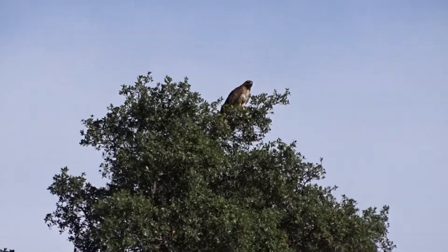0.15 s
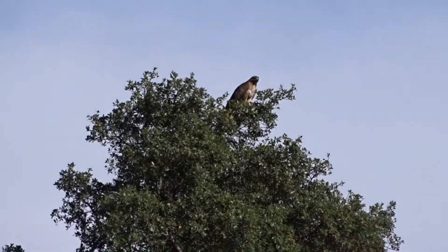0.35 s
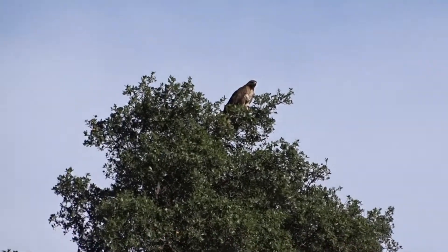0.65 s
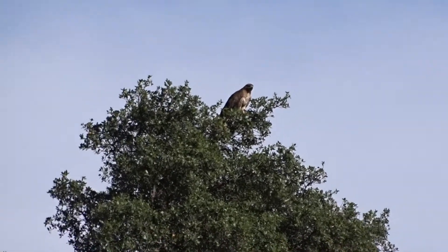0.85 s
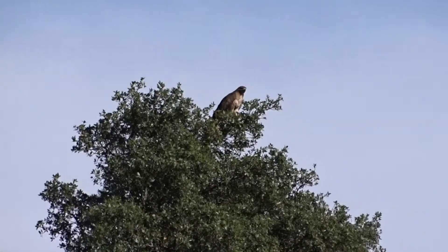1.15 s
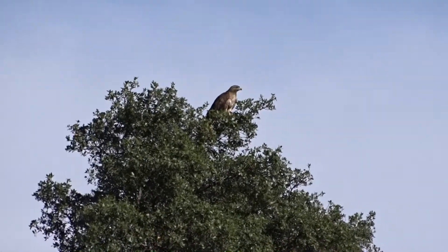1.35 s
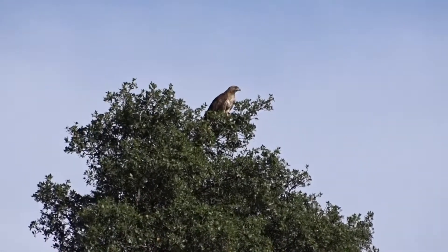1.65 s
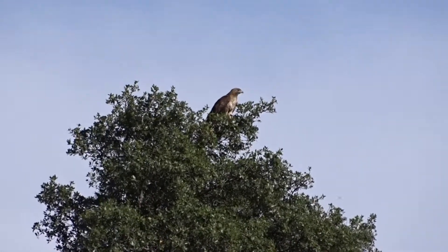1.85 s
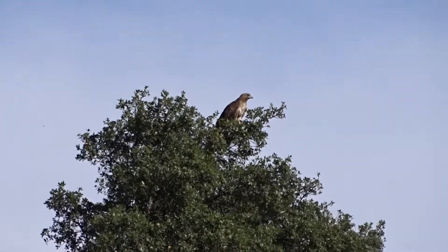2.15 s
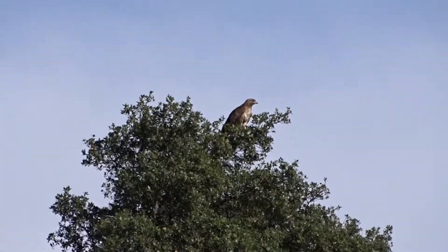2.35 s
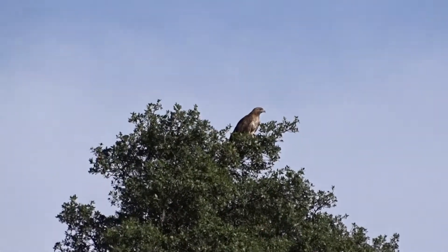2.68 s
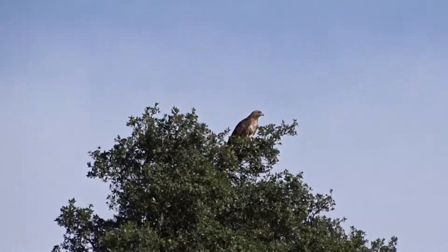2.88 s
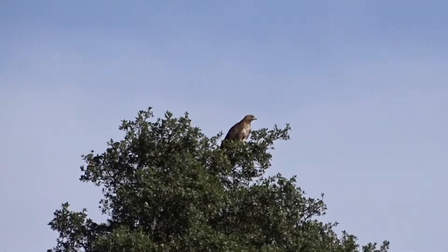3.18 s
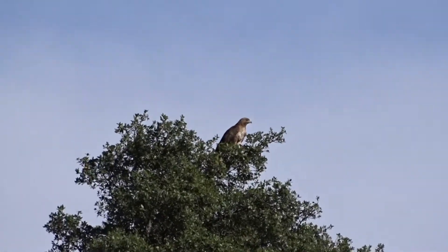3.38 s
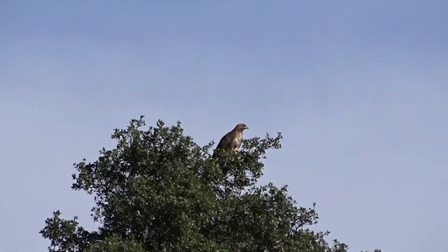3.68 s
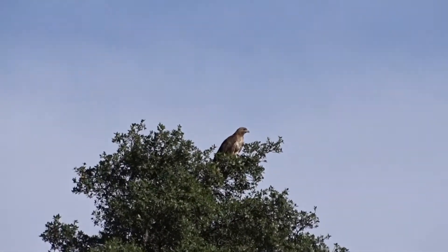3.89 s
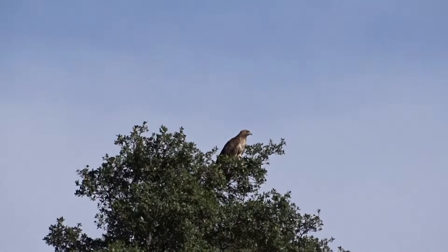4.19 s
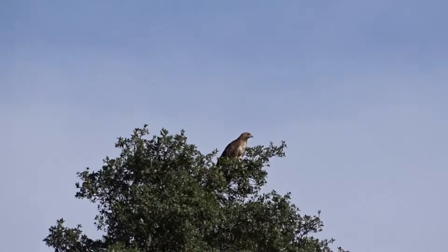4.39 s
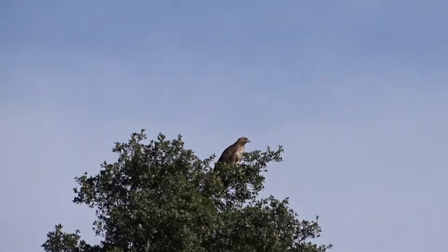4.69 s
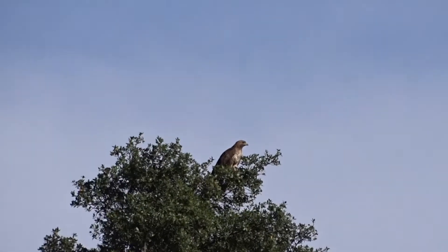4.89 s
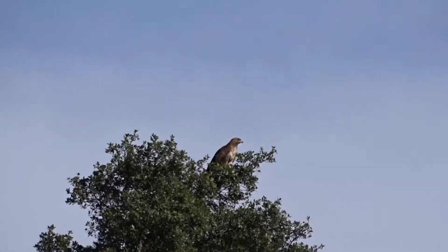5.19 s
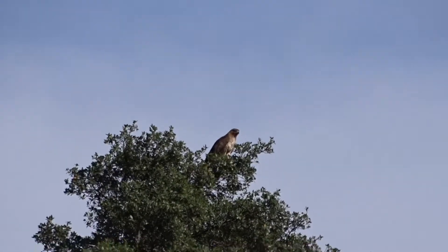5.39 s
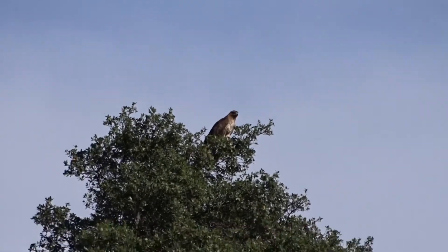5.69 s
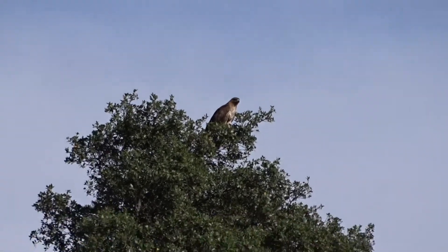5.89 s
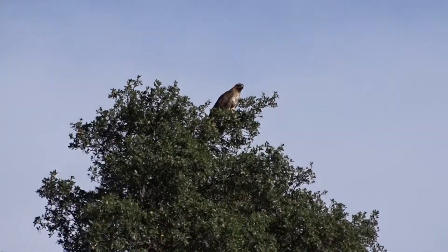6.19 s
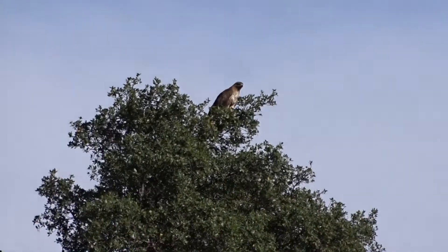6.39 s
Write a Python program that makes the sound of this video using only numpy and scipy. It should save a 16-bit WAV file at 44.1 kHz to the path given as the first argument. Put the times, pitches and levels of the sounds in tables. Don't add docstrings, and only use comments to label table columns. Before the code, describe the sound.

A perched hawk gives one harsh, raspy scream sliding downward for two seconds, over low wind thumps, distant traffic and faint bird chirps.

```python
import sys
import numpy as np
from scipy import signal
from scipy.fft import rfft, irfft
from scipy.io import wavfile
from scipy.ndimage import uniform_filter1d, minimum_filter1d

SR = 44100
rng = np.random.default_rng(int(sys.argv[2]) if len(sys.argv) > 2 else 0)


def volts(x):
    e = np.asarray(x, float) / 20
    return 10 ** e


def dump_mix(stems):
    frames = np.atleast_2d(stems).T
    limited = np.clip(frames, -1, 1)
    pcm = np.round(limited * 32767).astype(np.int16)
    wavfile.write(sys.argv[1], SR, pcm)


N = 288546
T = np.arange(N) / SR


def unit(x):
    return x / np.sqrt(np.mean(x ** 2))


def colour(x, table):
    hz, db = np.transpose(table)
    f = np.maximum(np.arange(N // 2 + 1) * SR / N, 1)
    curve_db = np.interp(np.log(f), np.log(hz), db, left=-90, right=-90)
    return irfft(rfft(x) * volts(curve_db), N)


def walk(rate_hz):
    k = max(int(SR / rate_hz), 1)
    noise = rng.standard_normal(N)
    return unit(uniform_filter1d(uniform_filter1d(noise, k), k))


def read(rows, fade_s=0.0036):
    s, *columns = np.transpose(rows)
    gate = np.clip(np.minimum(T - s[0], s[-1] - T) / fade_s + .5, 0, 1)
    return [np.interp(T, s, c) for c in columns] + [gate]


def ring(hz, width_hz):
    carrier = np.exp(2j * np.pi * np.cumsum(hz) / SR)
    return np.real(carrier * (walk(width_hz) + 1j * walk(width_hz)))


def pan(x, left_minus_right_db):
    half_db = left_minus_right_db / 2 + 0 * T
    return x * volts(np.array([half_db, -half_db]))


def stretch(s, length_s, from_hz, to_hz, fade_s=0.007):
    at = slice(int((s - fade_s) * SR), int((s + length_s + fade_s) * SR))
    gone = (T[at] - s) / length_s
    gate = np.clip(np.minimum(gone, 1 - gone) * length_s / fade_s + .5, 0, 1)
    gone = np.clip(gone, 0, 1)
    return at, gone, from_hz + (to_hz - from_hz) * gone, gate


def leaves(x, t60_s, db):
    t = T[:int(t60_s * SR)]
    tail = rng.standard_normal((2, len(t))) * np.exp(-np.log(1000) * t / t60_s)
    tail = tail / np.sqrt(np.sum(tail ** 2, axis=1, keepdims=True))
    return x + volts(db) * signal.fftconvolve(x[None], tail, axes=1)[:, :N]


def bed(table, side_db):
    mid, side = (colour(rng.standard_normal(N), table) * volts(0.31 * walk(6.8)) for _ in range(2))
    return unit(mid + volts(side_db) * side * np.array([[1], [-1]]))


# t/s, buffet level/dB, deep bass re buffet/dB
WIND_CURVE = [(0.0, -38, 0.5), (.55, -35, -6.5), (.9, -32, -12), (1.07, -34.5, -7.5), (1.18, -53.5, 0.5),
              (1.42, -34, 0), (1.58, -44, -4.5), (1.69, -26.5, -8), (1.8, -42.5, -2), (2.04, -40, 2),
              (2.55, -35.5, 1), (2.8, -46, 0), (3.35, -54, 3.5), (4.43, -42.5, -1.5), (4.87, -51.5, 7),
              (5.32, -43, 1), (5.75, -48.5, 4), (6.3, -47, 5)]
# f/Hz, level/dB per Hz
GUST_SPECTRUM = [(8.8, -46.5), (15, -9.5), (38, 2), (113, -0.5), (207, -8.5), (383, -20.5), (600, -38.5),
                 (780, -58), (1320, -120)]


def wind():
    db, deep_db, _ = read(WIND_CURVE)
    out, puffs = 0, np.clip(walk(34), -2.5, 2.1)
    bands = [(15, 60, .85, 1.5), (60, 95, .55, 2.5), (95, 130, .4, 3), (130, 220, .05, 4), (220, 600, -.7, 5)]
    for lo, hi, alike, lump_db in bands:
        band = [(lo * 0.89, -40), (lo, 0), (hi, 0), (hi * 0.99, -40)]

        def gusts():
            noise = colour(colour(rng.standard_normal(N), GUST_SPECTRUM), band)
            return noise * volts(lump_db * puffs + 1.2 * walk(5))

        mid, side = gusts(), gusts()
        deep = volts(deep_db * np.clip((150 - hi) / 90, 0, 1))
        opposed = side * np.array([[1], [-1]])
        out = out + deep * (np.sqrt(1 + alike) * mid + np.sqrt(1 - alike) * opposed)
    return unit(out) * volts(db + 0.5)


# f/Hz, level/dB per Hz
TRAFFIC_SPECTRUM = [(150, -31.5), (250, -13.5), (492, -12.5), (552, -12.5), (590, -16), (668, -11.5),
                    (726, -16), (1160, -20), (1800, -42), (2340, -68.5), (3960, -120)]
# f/Hz, level/dB per Hz
AIR_SPECTRUM = [(760, -29.5), (1300, -5.5), (2050, -7), (2570, -7.5), (2760, -11.5), (2970, -11),
                (3310, -15), (4160, -14.5), (4770, -22), (5170, -16.5), (5720, -23), (6150, -20.5),
                (7370, -19.5), (10600, -14), (11400, -25), (14800, -53.5), (22000, -120)]
# t/s, half length/s, level/dB
CARS = [
    (0.1, 0.35, 2.5),
    (1.732, 0.49, 1.5),
    (6.1, 0.34, 4.5),
]
TRAFFIC_DB, AIR_DB = -55, -67.5
HUM_HZ, HUM_DB = 660, -66


def town():
    db = TRAFFIC_DB + sum(swell_db * np.exp(-((T - s) / half_s) ** 2) for s, half_s, swell_db in CARS)
    hum = volts(HUM_DB + 2.5 + 1.8 * walk(12)) * ring(HUM_HZ + 0 * T, 45)
    hum = hum * np.clip((3.1 - T) / .1, .4, 1)
    rustle = volts(db - 32.0 + 2.2 * walk(6)) * ring(3300 + 500 * walk(1.5), 1600)
    whine = volts(-81.5) * ring(2580 + 0 * T, 250)
    traffic = volts(db) * bed(TRAFFIC_SPECTRUM, side_db=-5.5)
    air = volts(AIR_DB) * bed(AIR_SPECTRUM, side_db=-1.5)
    return traffic + air + hum + whine + rustle


def bumps(rows, cycles):
    out = np.zeros((2, N))
    for s, db, hz, *side_db in rows:
        t = np.maximum(T - s, 0) * hz
        swing = np.e * t / cycles * np.exp(-t / cycles) * np.sin(2 * np.pi * t)
        out += pan(volts(db) * swing, sum(side_db))
    return out


# t/s, peak level/dB, f/Hz, left minus right/dB
THUMP_EVENTS = [(0.028, -25, 115, -2), (0.129, -26, 208, -5), (0.179, -35, 96, -9), (0.334, -55, 91, 0),
                (0.445, -25.5, 193, 0), (0.579, -46, 72.7, -0.5), (0.654, -31, 114, 14),
                (0.769, -49, 120, 12), (0.816, -32, 109, 22), (0.872, -29, 129, 18), (1.01, -32, 81.4, 5),
                (1.062, -26, 114, 2), (1.112, -33, 100, 0), (2.866, -35.5, 95, -2), (3.405, -48, 150, -3),
                (3.435, -42, 131, 0), (3.458, -39.5, 89.8, 4), (3.478, -36.5, 78.6, -7),
                (1.215, -37, 110, 0), (1.315, -32.5, 115, 14), (1.375, -38, 78.5, 1.0),
                (1.526, -34, 102, -10), (1.61, -49, 96.9, -1.5), (1.707, -38.5, 74, -6),
                (2.014, -24.5, 146, -6), (2.161, -37, 166, 1), (2.392, -21, 137, 1), (2.45, -38, 82, -6),
                (3.041, -40, 73, -9), (3.105, -52, 334, 3), (4.414, -35.5, 73.5, -9.5),
                (6.22, -28, 73.5, -2.5), (6.297, -32.5, 72.2, 8), (6.497, -32.5, 140, -4)]


def thumps():
    return bumps(THUMP_EVENTS, cycles=0.22)


# t/s, top mode peak level/dB, low mode re top/dB, middle mode re top/dB
TICK_EVENTS = [(0.104, -31.5, -11, -13), (0.1434, -51, -1, -9), (0.751, -63, 13, -3), (0.7677, -61, 6, -8),
               (1.287, -19.5, -50, -14), (1.3892, -51, -8, -2), (1.4147, -54, 2, 0), (1.4431, -38, -12, -9),
               (1.4554, -52, -8, -12), (1.4754, -64, 15, 4), (1.5843, -49, -1, -16), (1.637, -45, 4.5, -3),
               (2.2174, -53.5, 0, -5), (2.8794, -55, -14, -11), (2.8958, -54, -10, -12),
               (2.917, -63, 15, 1), (2.973, -49.5, 3.5, 2), (5.0894, -47, 3, 2.5), (5.157, -47.5, -4, -20),
               (5.2124, -41, -15, -15), (5.235, -42, -24, 5.5), (5.289, -57, -14, -5),
               (5.3324, -69, 9.5, -6), (5.487, -53, -6, -13), (5.805, -41, -19, -9), (6.2945, -50, -20, -1),
               (6.442, -47.5, -16, 2)]
# f/Hz, width/Hz
TICK_MODES = [(3900, 3000), (7400, 690), (10000, 1280)]


def ticks():
    out, t = np.zeros((2, N)), T[:700]
    decay = np.exp(-t / .00035) + .22 * np.exp(-t / .002)
    grain = rng.standard_normal((len(TICK_EVENTS), 3, 700))
    for (s, db, *mode_db), g in zip(TICK_EVENTS, grain):
        burst = (g[0] + .35 * g[1:]) * decay
        ringing = 0
        for (hz, width_hz), rel_db in zip(TICK_MODES, mode_db + [0]):
            mode = signal.lfilter(*signal.iirpeak(hz, hz / width_hz, fs=SR), burst)
            mode = signal.lfilter(*signal.iirpeak(hz, hz / width_hz / 2, fs=SR), mode)
            ringing = ringing + volts(rel_db) * mode / np.abs(mode).max()
        i = int((s + .0005) * SR)
        out[:, i:i + 700] += volts(db) * ringing
    return out


# t/s, length to plunge/s, top f/Hz, plunge f/Hz, level/dB
CHIRPS = [
    (.275, .038, 6000, 4650, -59),
    (.382, .049, 5800, 4700, -53.5),
    (1.2, .027, 5720, 4950, -53.5),
    (1.548, .038, 5950, 4500, -56),
    (1.652, .05, 5680, 4550, -52.5),
    (5.322, .04, 5850, 4500, -59),
    (5.425, .06, 5200, 4150, -53.5),
]
# t/s, length/s, start f/Hz,
# end f/Hz, level/dB
ANSWERS = [(.315, .022, 4900, 3350, -64), (.433, .023, 4700, 3720, -63), (1.186, .015, 6080, 5680, -57),
           (1.229, .024, 5050, 3750, -58), (1.288, .067, 5580, 4370, -52), (1.589, .021, 4700, 3250, -61),
           (1.702, .021, 4620, 3600, -61), (5.364, .021, 4750, 3400, -61), (5.385, .012, 3360, 3300, -67),
           (5.485, .016, 5000, 4000, -66)]
# t/s, length/s, start f/Hz, end f/Hz, level/dB
FAR_CHIRPS = [(0.52, 0.021, 2920, 3900, -69), (0.538, 0.044, 3920, 2900, -71.5),
              (2.2, 0.027, 2950, 4030, -72), (1.952, 0.045, 3920, 2920, -69), (1.89, .06, 3940, 3870, -79),
              (2.23, 0.094, 4500, 4050, -77), (2.29, 0.098, 4100, 3800, -80),
              (2.44, 0.085, 3820, 3845, -79), (4.8, 0.14, 4850, 4120, -77), (5, 0.083, 4135, 3960, -80),
              (6, 0.016, 3750, 3390, -79.5), (5.588, 0.032, 3300, 3330, -81),
              (5.975, 0.027, 5800, 5800, -80), (6, 0.029, 5800, 4950, -78), (6.03, .036, 4950, 4330, -76),
              (6.16, 0.063, 6130, 6000, -83.5), (5.875, 0.018, 6100, 5500, -82),
              (.335, .045, 5250, 5400, -80), (.645, .035, 5230, 5250, -79), (0.545, .04, 4350, 3700, -78),
              (1.955, 0.044, 4000, 3650, -75), (6.45, 0.095, 4570, 4550, -83.5),
              (6.533, .02, 5870, 5500, -70)]
HOOK_HZ, HOOK_S = 350, .004
PLUNGE_HZ_PER_S, PLUNGE_S, PLUNGE_DB = 160000, .007, -14
CHIRP_BEND = 1.3
CHIRP_PEAK, CHIRP_EDGE_DB = 0.62, -3.5


def birds():
    out, waver = np.zeros(N), walk(87)
    for rows, near, leads in ((CHIRPS, 1, 1), (ANSWERS, 1, 0), (FAR_CHIRPS, 0, 0)):
        bend, waver_db = (CHIRP_BEND, 2.2) if near else (1, 3)
        for s, length_s, from_hz, to_hz, top_db in rows:
            at, _, _, gate = stretch(s, length_s + leads * PLUNGE_S, from_hz, to_hz, fade_s=.005)
            since = np.maximum(T[at] - s, 0)
            gone = np.minimum(since / length_s, 1)
            late = leads * np.maximum(since - length_s, 0)
            hz = from_hz + (to_hz - from_hz) * gone ** bend
            hz = hz - leads * HOOK_HZ * np.exp(-since / HOOK_S) - PLUNGE_HZ_PER_S * late
            edge = (gone - CHIRP_PEAK) / (1 - CHIRP_PEAK)
            db = top_db + CHIRP_EDGE_DB * edge ** 2 + PLUNGE_DB * late / PLUNGE_S
            phase = 2 * np.pi * np.cumsum(hz) / SR
            tone = np.sin(phase) + volts(-32) * np.sin(2 * phase)
            out[at] += np.sqrt(2) * volts(db + waver_db * waver[at]) * gate * tone
    return out


# t/s, peak level/dB, f/Hz
KNOCK_EVENTS = [(3.0408, -47, 1260), (3.0435, -24.5, 894), (3.0435, -38, 385), (3.044, -32.5, 2360),
                (3.044, -44, 1920), (3.061, -42, 480), (3.061, -43, 900), (3.1055, -36, 426),
                (3.106, -37.5, 744), (3.114, -40, 442), (3.1155, -42, 780), (3.129, -44, 710)]


def knocks():
    return bumps(KNOCK_EVENTS, cycles=0.93)


BEAK_OPENS_S = 3.0432
DUCK_DB, DUCK_HOLD_S, DUCK_RELEASE_S = -2.5, 0.82, 0.67


def duck():
    since = T - BEAK_OPENS_S
    attack = np.clip(since / .04, 0, 1)
    release = np.clip(1 - (since - DUCK_HOLD_S) / DUCK_RELEASE_S, 0, 1)
    return volts(DUCK_DB * attack * release)


CAVITY_BUILD_S, CAVITY_SHUTS = .35, 1.33


def sounding(ratio):
    build = np.clip((T - BEAK_OPENS_S) / CAVITY_BUILD_S, .2, 1)
    return build * np.clip((ratio - CAVITY_SHUTS) / 0.079, .08, 1)


# t/s, beak hiss level/dB, throat resonance f/Hz
BREATH_CURVE = [
    (3.04, -35.5, 4145),
    (3.055, -22, 4200),
    (3.19, -17.5, 4222),
    (3.75, -20, 3920),
    (4.03, -28, 3666),
    (4.36, -27.5, 3427),
    (4.9, -37, 2840),
    (5.03, -50, 2674),
    (5.085, -68.5, 2565),
]
# f/Hz, level/dB per Hz
HISS_SPECTRUM = [(2880, -38), (4900, -9.5), (5000, -17), (5370, -10), (5990, -14), (6660, -5), (7300, -1),
                 (7670, -2.5), (8380, -9.5), (9300, -7), (10500, -7), (11000, -11), (11200, -38.5),
                 (11400, -30), (14800, -45), (22000, -120)]
# f/Hz, level/dB
RASP_MOUTH = [(500, -33.5), (1200, -21.5), (1900, -2), (2400, -8), (3300, -2), (4200, 4.5), (4400, -5.5),
              (4750, 11.5), (4950, -21.5), (5400, -18.5), (6500, -47.5)]
# start f/Hz, sink/Hz per Hz of throat, width/Hz, level re hiss/dB, gain/dB per kHz of throat
CAVITIES = [(1878, .31, 110, -39.5, 20.5), (2389, 0.12, 170, -45.5, 40.5), (1485, 0.14, 218, -77, 45.5),
            (814, 0.018, 370, -38.5, 6.5)]
THROAT_OPEN_HZ = 4200
RASP_DB, RASP_DB_PER_KHZ = -11.5, 15
UPPER_HZ, UPPER_SINK, UPPER_WIDTH_HZ, UPPER_DB, UPPER_DB_PER_KHZ = 10280, 1.35, 1500, -3, 3


def breath():
    hiss_db, throat_hz, gate = read(BREATH_CURVE, fade_s=0.0019)
    sunk_hz = THROAT_OPEN_HZ - throat_hz
    sunk_khz = sunk_hz / 1000
    bursts = volts(2.2 * walk(800) + .7 * walk(200) + .4 * walk(25))
    hiss = unit(bursts * colour(rng.standard_normal(N), HISS_SPECTRUM))
    rasp = unit(colour(ring(throat_hz, 1900) * volts(1.1 * walk(29)), RASP_MOUTH))
    rasp = volts(RASP_DB + RASP_DB_PER_KHZ * sunk_khz) * rasp
    palate = volts(-19.0) * ring(4580 + 0 * T, 990)
    broad = volts(-40) * ring(2000 + 0 * T, 2500)
    lows = 0
    for start_hz, follow, width_hz, db, db_per_khz in CAVITIES:
        hz = start_hz - follow * sunk_hz
        level = volts(db + db_per_khz * sunk_khz + 1.2 * walk(35))
        lows = lows + level * ring(hz, width_hz) * sounding(throat_hz / hz)
    upper = ring(UPPER_HZ - UPPER_SINK * sunk_hz, UPPER_WIDTH_HZ) / 2
    upper = volts(UPPER_DB + UPPER_DB_PER_KHZ * sunk_khz) * upper
    voice = hiss + upper + rasp + palate + broad + lows
    return gate * (T > BEAK_OPENS_S) * volts(hiss_db) * voice


# t/s, length/s, start f/Hz, end f/Hz, level/dB
WHISTLE_NOTES = [(3.072, 0.023, 4610, 4640, -24), (3.128, 0.027, 4870, 4740, -22),
                 (3.16, 0.012, 4700, 4620, -16), (3.195, 0.045, 4640, 4530, -18.5),
                 (3.235, 0.027, 4500, 4290, -20.5), (3.262, 0.048, 4270, 4270, -19.5),
                 (3.307, 0.049, 4680, 4620, -13), (3.342, 0.015, 4670, 4450, -14),
                 (3.365, 0.038, 4590, 4670, -12.5), (3.4, 0.044, 4620, 4440, -18.5),
                 (3.442, 0.02, 4340, 4400, -17.5), (3.472, 0.036, 4340, 4070, -19.5),
                 (3.496, 0.023, 4290, 4280, -11), (3.518, 0.016, 4610, 4630, -17),
                 (3.536, 0.046, 4330, 4000, -18), (3.566, .012, 4500, 4560, -21),
                 (3.582, 0.044, 4420, 4560, -15), (3.64, .028, 4200, 4290, -17.5),
                 (3.696, 0.036, 4150, 4034, -14.5), (3.724, 0.037, 4160, 4070, -14.5),
                 (3.766, 0.061, 4094, 3880, -10), (3.822, 0.033, 3910, 3800, -10.5),
                 (3.854, .03, 3700, 3760, -11), (3.895, .02, 3730, 3860, -12.5),
                 (3.915, 0.01, 3630, 3585, -9), (3.93, 0.041, 3840, 3600, -13),
                 (3.968, .062, 3580, 3424, -8), (4.03, 0.032, 3454, 3483, -8.5),
                 (4.066, .04, 3355, 3312, -10.5), (4.106, 0.074, 3334, 3283, -8.5),
                 (4.184, 0.018, 3170, 3190, -12), (4.2, 0.075, 3270, 3300, -6),
                 (4.278, 0.04, 3237, 3123, -8.5), (4.318, 0.096, 3247, 3077, -12),
                 (4.412, 0.065, 3080, 2995, -11), (4.48, 0.03, 2960, 2830, -18.5),
                 (4.505, 0.089, 3000, 3040, -23), (4.585, 0.085, 3066, 2848, -16),
                 (4.66, 0.057, 2825, 2660, -16.5)]
# t/s, length/s, start f/Hz, end
# f/Hz, level/dB
STRAND_NOTES = [(3.255, 0.024, 3870, 3865, -26), (3.288, 0.026, 3850, 4000, -29),
                (3.41, 0.026, 3830, 3820, -24), (3.524, 0.023, 4070, 4130, -17.5),
                (3.574, 0.042, 3920, 3970, -18), (3.61, 0.039, 3850, 3850, -16),
                (3.656, 0.036, 3690, 3700, -20), (3.747, 0.025, 3450, 3500, -25),
                (3.884, 0.011, 3600, 3600, -9), (3.903, .066, 3470, 3370, -19),
                (4.74, .03, 2620, 2560, -17), (4.777, 0.017, 2360, 2375, -13.5),
                (4.797, .016, 2330, 2280, -21.5), (4.813, .018, 2270, 2320, -31.5),
                (4.724, .02, 2720, 2656, -28), (4.834, .03, 2290, 2150, -23),
                (4.867, 0.046, 2315, 2240, -34.5), (4.907, .04, 1910, 1880, -37.5),
                (4.964, .024, 1840, 1800, -30.5), (4.993, 0.017, 1755, 1730, -36.5),
                (4.988, 0.019, 2300, 2300, -33.5), (5.013, .026, 2170, 1960, -29),
                (5.039, .024, 1920, 1760, -29.5), (5.067, .018, 1790, 1770, -44)]
OVERTONES = [(2, -27), (3, -35)]
# t/s, roughness/0-1
HOARSE_CURVE = [(3.29, .55), (3.31, .28), (3.43, .3), (3.47, .6), (3.5, .3), (3.54, .65), (3.585, .4),
                (3.63, .4), (3.68, .7), (3.72, .35), (3.76, .33), (3.86, .35), (3.9, .5), (3.96, .55),
                (3.97, .25), (4.17, .35), (4.22, .2), (4.31, .2), (4.34, .4), (4.55, .6), (4.75, .5),
                (4.775, .12), (4.8, .15), (4.82, .65), (4.95, .6), (4.97, .4), (5.06, .5)]
RISE_DB = 1


def whistle():
    skirt = walk(1100) + 1j * walk(870)
    rough = read(HOARSE_CURVE)[0]
    out = np.zeros(N)
    for notes in (WHISTLE_NOTES, STRAND_NOTES):
        wobble = walk(200) + .1 * walk(45)
        flutter = walk(400) + 1j * walk(400)
        shape = 1 - 0.72 * rough + 0.588 * rough * flutter + volts(-21.5) * skirt
        for s, length_s, from_hz, to_hz, top_db in notes:
            at, gone, hz, gate = stretch(s, length_s, from_hz, to_hz)
            db = top_db + RISE_DB * (gone ** 2 - .5)
            hz = hz * (1 + .012 * (rough * wobble)[at])
            turn = np.exp(2j * np.pi * np.cumsum(hz) / SR)
            tone = turn + sum(volts(d + .8 * (db + 14.5)) * turn ** round(k) for k, d in OVERTONES)
            out[at] += np.sqrt(2) * volts(db) * gate * (tone * shape[at]).real
    return out


# f/Hz, width/Hz
SHELL_NOTCHES = [(2050, 200), (2600, 150), (4920, 250), (8120, 550)]


def shell(x, depth):
    for hz, width_hz in SHELL_NOTCHES:
        x = x - depth * signal.lfilter(*signal.iirpeak(hz, hz / width_hz, fs=SR), x)
    return x


# f/Hz, level/dB
PORT_SPREAD = [(500, 0), (3000, 0), (5000, -2), (7500, -5.5), (10500, 4), (21000, 1.5)]


def spread(x):
    mid, side = (x[0] + x[1]) / 2, colour((x[0] - x[1]) / 2, PORT_SPREAD)
    return np.array([mid + side, mid - side])


# f/Hz, level/dB
WHISTLE_RANGE = [(900, -40), (1650, 0), (21000, 0)]


def scene():
    background = duck() * (wind() + town())
    camera = ticks() + knocks()
    chirps = leaves(birds(), t60_s=.13, db=-9)
    air = leaves(breath(), t60_s=.12, db=-14)
    voice = leaves(colour(whistle(), WHISTLE_RANGE), t60_s=.12, db=-22)
    scream = spread(shell(voice + air, depth=0.62))
    return background + thumps() + camera + chirps + scream


def low_pass(x):
    return signal.sosfilt(signal.butter(12, 12010, fs=SR, output="sos"), x)


LIMIT_DB, TOP_HZ = -6.5, 11080


def record(dry):
    peak = -minimum_filter1d(-np.abs(dry).max(axis=0), size=180)
    gain = uniform_filter1d(np.minimum(1, volts(LIMIT_DB) / (peak + 1e-9)), size=180)
    lowpass = signal.ellip(10, .3, 70, TOP_HZ, fs=SR, output="sos")
    mix = signal.sosfilt(lowpass, dry * gain)
    return low_pass(mix)


dry = scene()
out = record(dry)
dump_mix(out)
```